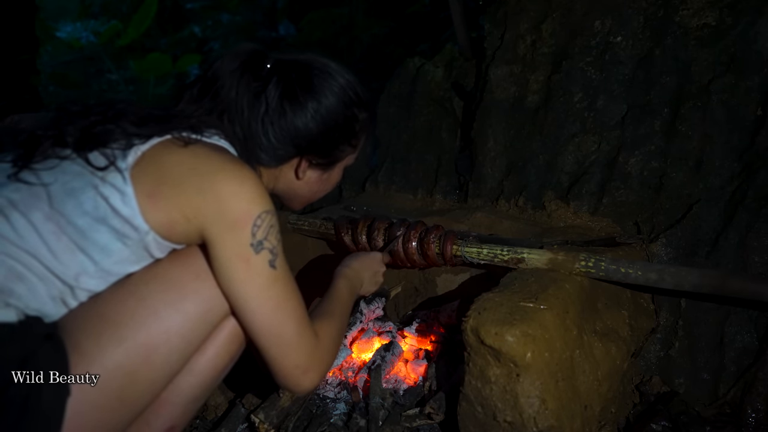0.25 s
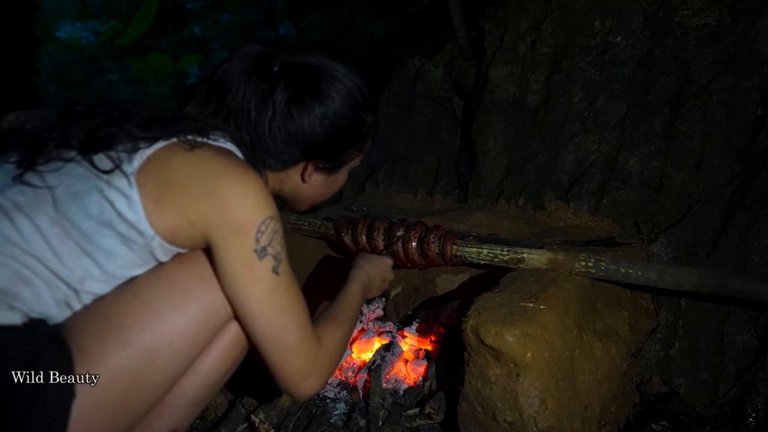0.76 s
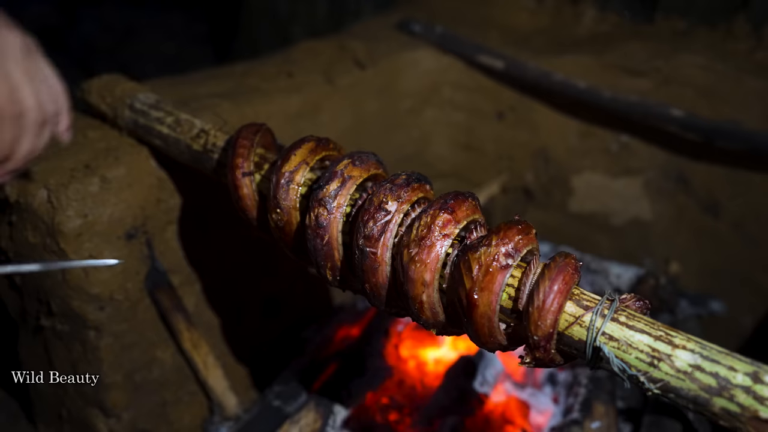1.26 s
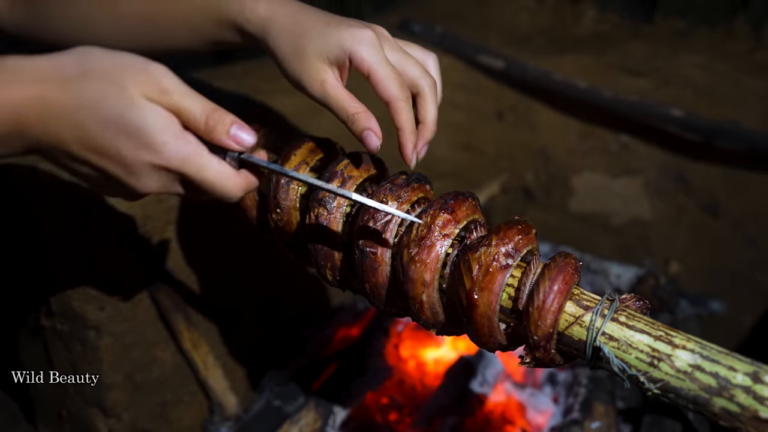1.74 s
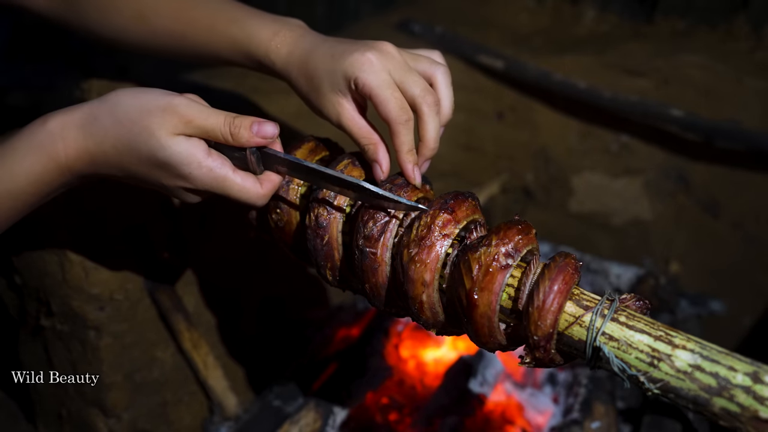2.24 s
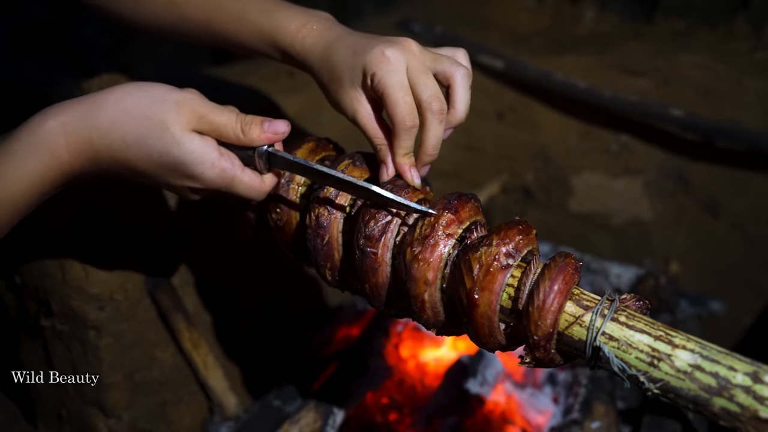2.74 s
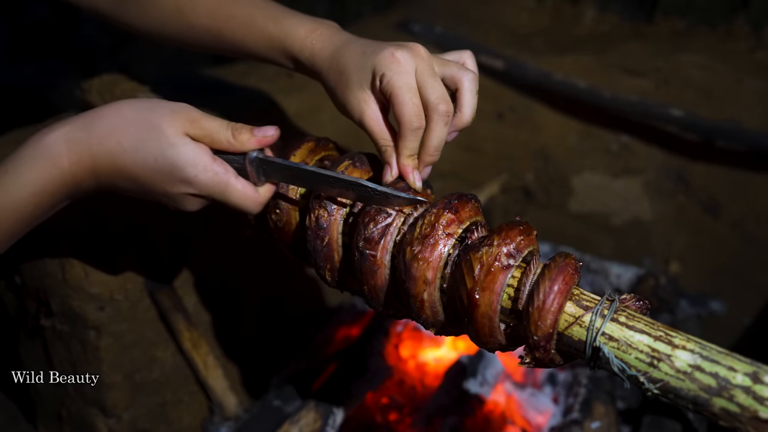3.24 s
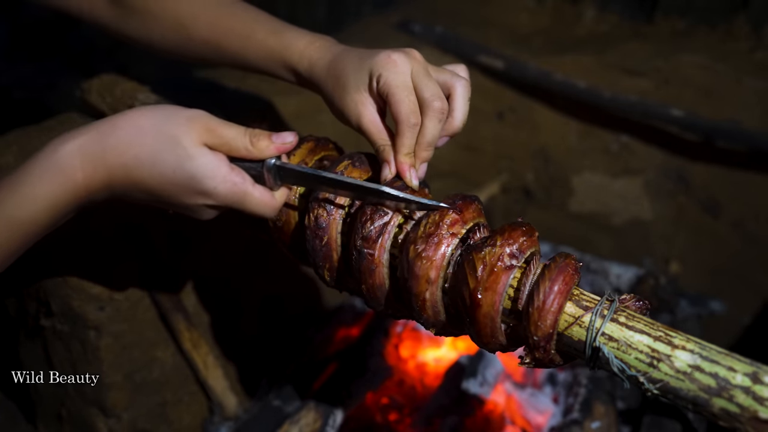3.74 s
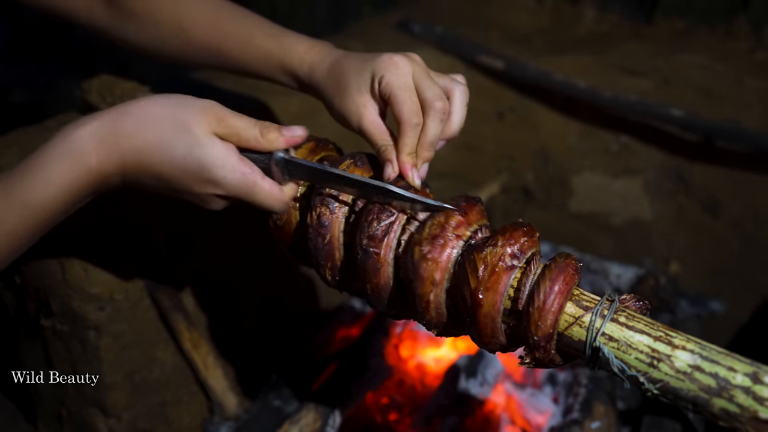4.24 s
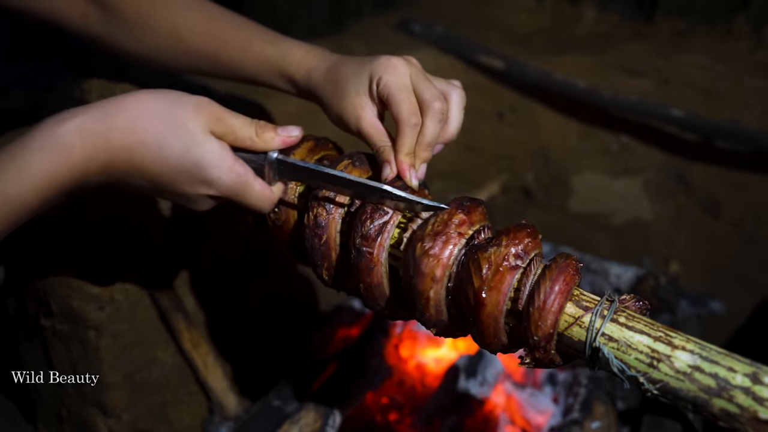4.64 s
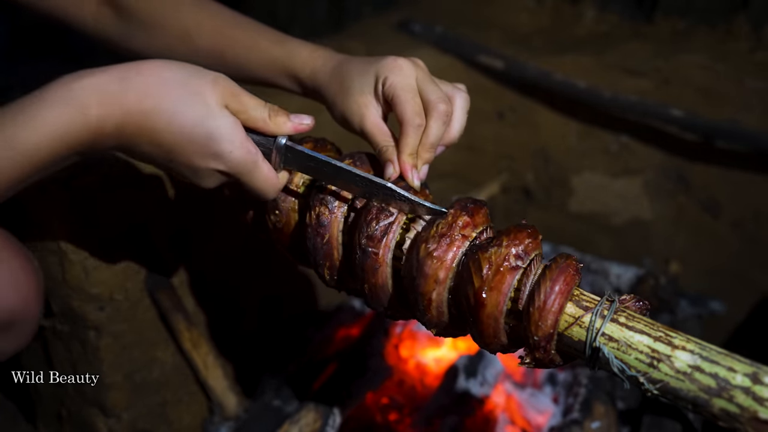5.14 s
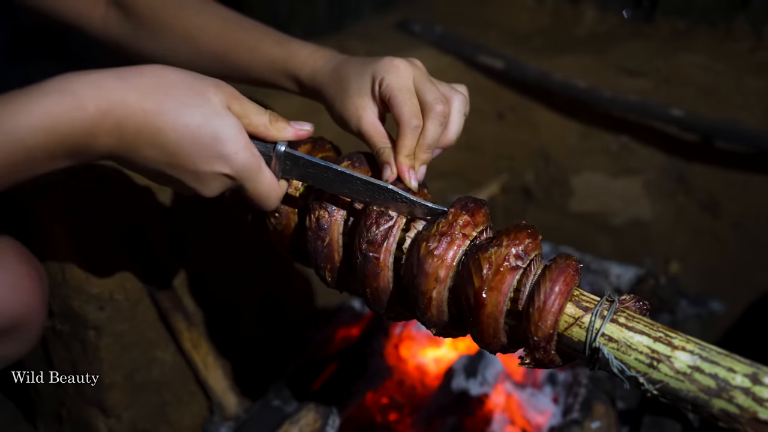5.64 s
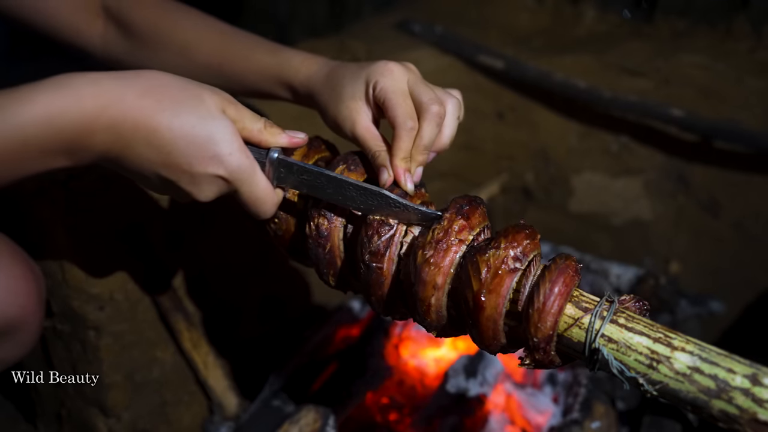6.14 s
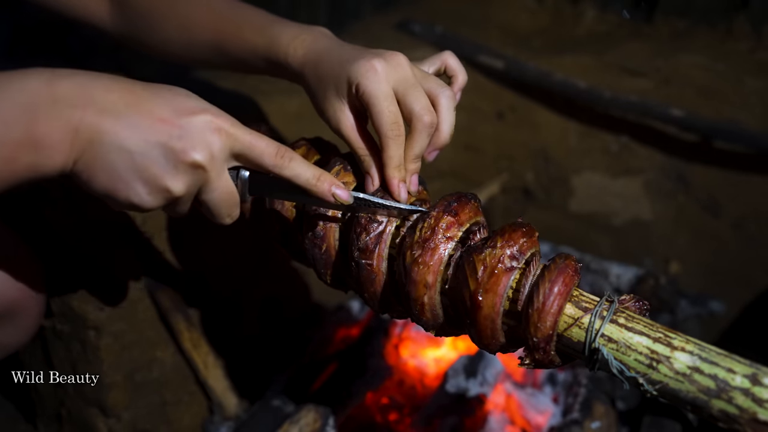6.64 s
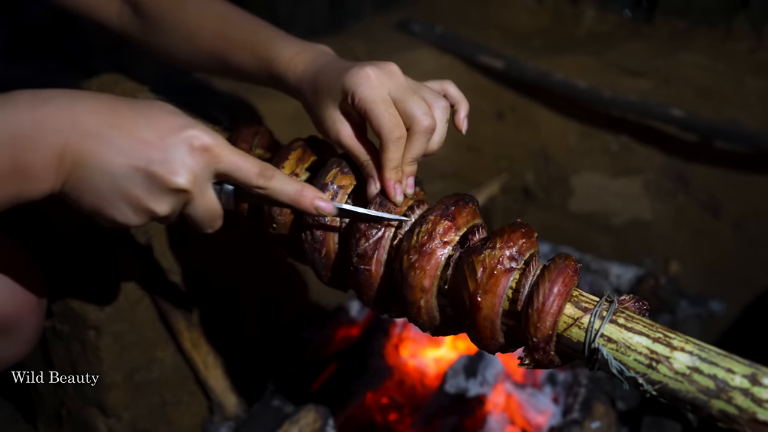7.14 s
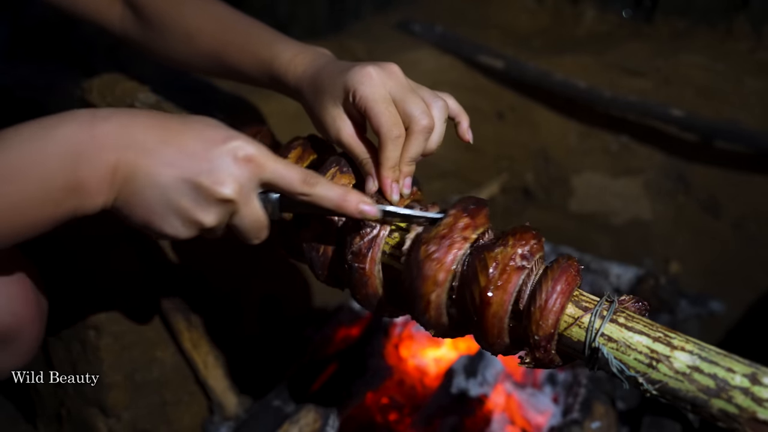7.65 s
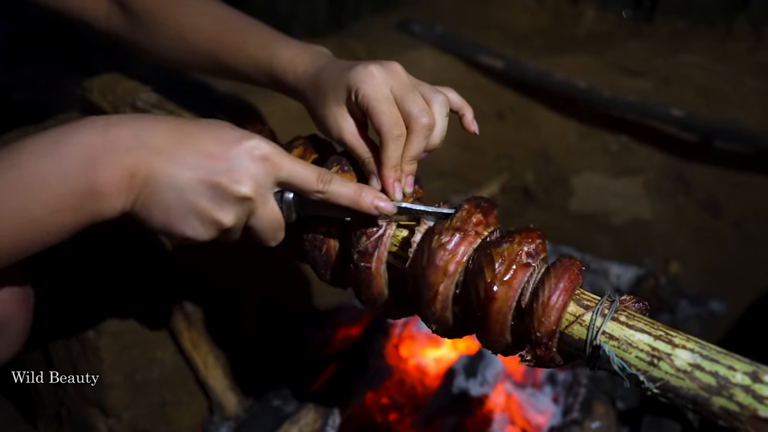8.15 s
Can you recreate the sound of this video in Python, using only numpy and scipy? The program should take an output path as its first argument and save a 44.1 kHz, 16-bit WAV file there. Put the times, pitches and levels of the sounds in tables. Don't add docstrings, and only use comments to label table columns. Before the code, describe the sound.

From 0 to 1.2 s a night forest is quiet: steady high crickets, a thin insect whine, fast bright katydid chirps about every 0.08 s, soft air and tiny fire pops. At 1.25 s the sound moves close to the embers, with slightly more sizzle; the katydid stops. From 1.9 to 3 s faint, uneven knife scratches and small crackles test the crust, with barely audible steam whistles. From 3.1 to 6.1 s the knife saws steadily, about seven short gritty rasps per second, with snapping fibres and bright fat ticks. The loudest crack strikes at 4.93 s, another cluster at 5.15-5.5 s, with brief blade ring and low spit shudder. After a lull around 6.3-6.7 s with soft knocks and ticks, sawing resumes until 8.4 s, denser, with loud tears near 7.3, 7.6, 7.85 and 8.1 s and increasingly hollow bamboo thuds. Close, dry, slight earth-bank scatter.

```python
import sys
import numpy as np
from scipy import signal
from scipy.fft import rfft, irfft, next_fast_len
from scipy.io import wavfile
from scipy.ndimage import uniform_filter1d

SR = 44100
rng = np.random.default_rng(int(sys.argv[2]) if len(sys.argv) > 2 else 0)


def dump(signal):
    limited = np.clip(np.atleast_2d(signal).T, -1, 1)
    pcm = np.round(limited * 32767).astype(np.int16)
    wavfile.write(sys.argv[1], SR, pcm)


def ratio_of_db(decibels):
    return 10 ** (np.asarray(decibels, float) / 20)


N = 369999

# start in seconds, length in seconds, rasp level in dB,
# place of hardest pressure from 0 to 1.
SCORING_STROKES = [
    (1.86, 0.071, -53, 0.44),
    (2.285, 0.053, -58, 0.1),
    (2.529, 0.051, -46, 0.22),
    (2.569, 0.077, -39, 0.3),
    (2.656, 0.054, -50, 0.1),
    (2.812, 0.11, -50, 0.4),
    (2.916, 0.056, -45, 0.43),
    (2.967, 0.091, -41, 0.24),
]
# start in seconds, length in seconds, rasp level in dB, place of hardest pressure 0-1.
FIRST_CUT_STROKES = [(3.105, 0.11, -38, 0.56), (3.246, 0.098, -39, 0.61), (3.394, 0.087, -36.5, 0.64),
                     (3.534, 0.081, -32.5, 0.62), (3.664, 0.086, -37, 0.59), (3.811, 0.087, -31.5, 0.33),
                     (3.965, 0.086, -34, 0.27), (4.089, 0.11, -34, 0.68), (4.274, 0.091, -35.5, 0.23),
                     (4.393, 0.11, -32.5, 0.87), (4.572, 0.09, -35, 0.65), (4.708, 0.1, -33.5, 0.71),
                     (4.861, 0.071, -30.5, 0.73), (5.005, 0.084, -36.5, 0.68), (5.135, 0.061, -24, 0.28),
                     (5.274, 0.093, -34.5, 0.65), (5.405, 0.041, -42, 0.54), (5.481, 0.011, -30.5, 0.15),
                     (5.627, 0.025, -21.5, 0), (5.638, 0.067, -41.5, 0), (5.76, 0.078, -34, 0.4),
                     (5.873, 0.06, -38, 0.45), (5.908, 0.077, -33.5, 0.46), (6.044, 0.057, -39.5, 0.6),
                     (6.304, .051, -50.5, 0.27)]
# start in seconds, length in seconds, rasp level in dB,
# place of hardest pressure 0-1.
SECOND_CUT_STROKES = [(6.776, 0.06, -45.5, 0.64), (6.888, 0.083, -42, 0.8), (7.025, 0.071, -37.5, 0.56),
                      (7.164, 0.089, -35.5, 0.47), (7.319, 0.066, -36, 0.34), (7.44, 0.08, -32, 0.73),
                      (7.593, 0.055, -41.5, 0.53), (7.711, 0.078, -29, 0.67), (7.876, 0.065, -36.5, 0),
                      (7.974, 0.083, -32.5, 0.68), (8.133, 0.051, -38, 0.35), (8.25, 0.072, -30, 0.9)]
# start in seconds, length in seconds, rasp level in dB.
RIDGE_BITES = [
    (6.194, 0.03, -39.5),
    (7.308, 0.026, -23),
    (7.57, 0.036, -24.5),
    (7.849, 0.029, -25),
    (8.107, 0.045, -22),
]
# stroke start in seconds, lift of upper modes in dB,
# lift of grit in dB, lift of thud in dB.
EDGE_CONTACT = [(1.863, 1, 5, -8), (2.283, 8, 8, -12), (2.531, 7.5, 5, 0), (2.569, 2.5, -1, -3.5),
                (2.655, -4, -2, 3), (2.817, 3, 9, 3), (2.916, 0, 4.5, 1), (2.966, 4.5, -9, 1.5),
                (3.105, 2.5, 3, 3), (3.244, 6, -12, 2.5), (3.394, 2, -4.5, 1), (3.537, 2.5, 1, -0.5),
                (3.663, 1.5, 0, 0.5), (3.813, -1, -6, -2), (3.968, -0.5, 4, -1.5), (4.087, 1, 2, 0.5),
                (4.275, 2, 8, 2.5), (4.397, 0.0, -3, 0.5), (4.568, 0, -0.5, 1.5), (4.711, 0.5, -0.5, 4.5),
                (4.857, 1.5, 1, 0), (5.008, 0.5, -3, 1.5), (5.134, -5, 7.5, -2), (5.277, 0.5, 0, 2.5),
                (5.401, -1, -3, -2), (5.481, 6, 7, -1), (5.626, -1.5, 3, -7.5), (5.64, 1, 4, 3),
                (5.76, 3, 1, 0.5), (5.876, 0, -13, -3.5), (5.909, -1, 3.5, -1.5), (6.045, -1.5, 1, 1.0),
                (6.196, 3, -4, 2), (6.303, 1.5, -3, -4), (6.776, 3, 1.5, 3), (6.891, 3, 0, -1.5),
                (7.027, 4, -2.5, 1), (7.166, 0.5, -3, -3.5), (7.309, 3.5, -8, 0), (7.32, 3.5, 0.5, -2.5),
                (7.443, -2, 0, -3), (7.571, -2, -2, -2.5), (7.591, 6.5, 4, -3), (7.713, -1.5, 0, -2),
                (7.848, 4, 7, 2.5), (7.874, 0.5, 8, -3), (7.974, -2.5, 6.5, 0), (8.104, 1, -5, -3),
                (8.135, 2, 4, -5.5), (8.249, 0.5, 2, -1.0)]
# frequency in Hz, width in Hz, level in dB.
BODY_MODES = [(920, 460, -4), (1238, 238, 1.5), (1700, 238, 5.5), (2290, 520, 1.5), (2690, 380, 3.5),
              (3096, 390, 0), (4080, 960, -6.5), (620, 890, -7.5)]
# frequency in Hz, width in Hz.
BLADE_RING = (6100, 135)
# time in seconds, level in dB against the grit.
GRIP_CURVE = [(2.6, -5), (2.9, -22), (3.15, -2), (3.5, -2), (3.8, -30), (4.6, -19), (4.77, -1), (4.9, -12),
              (5.2, -6), (5.6, -13), (8.39, -27)]
# time in seconds, share of the hollow thud from 0 to 1,
# thud in dB against the rasp, grit gain in dB.
HOLLOW_CURVE = [(2.5, 0.24, -11.5, -4.5), (3.5, 0.36, -12, -1), (5.3, 0.53, -13.5, 2.5),
                (6.1, 0.36, -10, -2), (6.8, 0.46, -8, 2), (7.2, 0.54, -4.5, 2), (7.8, 0.67, -8, -2),
                (8.3, 0.76, -5, -2.5)]
# time in
# seconds, peak in dB, centre in Hz.
CRUST_BREAKS = [(0.0226, -37, 2500), (0.2134, -31, 3950), (1.4494, -27, 4300), (1.6318, -33, 4500),
                (1.922, -27.5, 4000), (2.326, -28, 2600), (2.5285, -29.5, 2590), (2.5847, -22.5, 2880),
                (2.6624, -23, 2530), (2.6919, -24.5, 3130), (2.8392, -25.5, 2500), (3.153, -21.5, 3900),
                (3.267, -22, 2860), (3.404, -31, 3100), (3.4338, -28, 1090), (3.5253, -17, 4400),
                (3.5255, -20, 2100), (3.5473, -20, 2430), (3.5812, -20, 1650), (3.8282, -18, 2020),
                (3.9741, -20, 1710),
                (4.184, -22, 1820), (4.2815, -23, 1230), (4.3068, -21.5, 1550), (4.584, -33, 1640),
                    (4.6134, -24, 3920), (4.741, -28, 1100), (4.768, -14.5, 5800), (4.869, -36, 1560),
                    (4.8825, -28, 1230), (4.9314, -2, 4400), (5.139, -13, 4200), (5.1477, -9, 2940),
                    (5.1738, -7.5, 1900), (5.2821, -30.5, 2480), (5.3897, -33, 2210), (5.4824, -16.5, 1620),
                    (5.4825, -9, 7350), (5.5766, -30, 4830), (5.6268, -16, 5970), (5.776, -25, 2410),
                    (5.888, -24, 1730), (5.9266, -24, 1230), (6.0503, -29, 2640), (6.109, -32.5, 4130),
                    (6.2014, -20, 2300),
                (6.758, -27, 1570), (6.786, -25, 3040), (6.7976, -21.5, 3400), (7.0076, -30, 3860),
                     (7.038, -25, 3790), (7.0763, -22.5, 1880), (7.1528, -28, 4400), (7.219, -16.5, 2500),
                     (7.2857, -20, 4350), (7.3104, -11, 1720), (7.3145, -23, 2300), (7.422, -28, 8360),
                     (7.437, -28, 2640), (7.65, -26.5, 4840), (7.848, -14, 1490), (7.8843, -11, 1700),
                     (7.991, -28.5, 1200), (8.019, -17.5, 1720), (8.126, -11, 1700)]
# time in seconds, # peak in dB, centre in Hz.
FURTHER_BREAKS = [(0.67, -38, 1900), (1.373, -35, 4990), (1.8908, -29, 4330), (1.91, -31, 4230),
                  (2.291, -33, 2270), (2.335, -28, 5030), (3.1707, -22, 1980), (3.286, -21, 2450),
                  (3.453, -23, 6040), (3.597, -25, 2190), (3.6855, -26, 2850), (3.7117, -23, 1660),
                  (3.8491, -17, 2200), (3.843, -15.5, 2600), (3.9802, -19, 2290), (4.2335, -34.5, 1730),
                  (4.476, -13.5, 1330), (4.5638, -23.5, 1120), (4.6902, -37, 1080), (4.9754, -32, 1380),
                  (5.1647, -7.5, 1700), (5.255, -30, 3500), (5.9554, -19.5, 1900), (6.0623, -22, 2620),
                  (6.1704, -25, 4870), (6.1852, -26, 3500), (6.337, -28, 4700), (6.575, -29, 4520),
                  (6.66, -28, 4340), (6.7094, -30, 3920), (6.793, -17, 3380), (6.8134, -25, 3330),
                  (6.876, -25, 4590), (6.9598, -24, 2600), (7.086, -18, 1440), (7.133, -31, 5080),
                  (7.2606, -34, 4670), (7.312, -7, 1660), (7.317, -17, 2660), (7.3534, -31, 2670),
                  (7.4796, -23, 1590), (7.5766, -15, 1910), (7.72, -26, 2610), (7.855, -13, 3070),
                  (8.1085, -9, 1800), (8.112, -14, 1690), (8.302, -16.5, 1500), (7.5895, -8.5, 1890),
                  (7.768, -14, 2000), (7.88, -21, 1700), (4.794, -23, 3500), (5.076, -18, 3500)]
# time in seconds, peak in dB.
BLADE_JOLTS = [
    (2.19, -45),
    (2.253, -48),
    (3.526, -25),
    (5.15, -17),
    (5.482, -21.5),
    (5.628, -23),
    (6.801, -29),
]
# time in seconds, peak in dB, centre in Hz.
HAND_KNOCKS = [(0.666, -55, 215), (0.973, -42.5, 1270), (1.39, -42.5, 1070), (1.778, -40, 1700),
               (1.872, -45, 1100), (1.924, -41, 198), (2.625, -35, 525), (2.986, -42, 2840),
               (3.431, -27.5, 473), (3.436, -35, 174), (3.777, -35, 2340), (6.541, -40.5, 520),
               (6.567, -37, 2200), (6.637, -39.5, 182), (5.31, -33.5, 350), (7.848, -22, 430),
               (7.886, -29, 326), (8.108, -24.5, 403)]
# time in
# seconds, # peak in dB.
BRIGHT_TICKS = [(0.7118, -41), (1.6307, -30), (2.5365, -26), (3.5803, -19), (3.671, -25), (3.685, -22),
                          (3.901, -28), (3.9799, -22), (4.187, -15), (4.347, -23), (4.5863, -22), (4.6139, -21),
                          (4.6488, -23), (5.076, -29), (5.148, -10), (5.4246, -25), (5.4817, -8.5), (5.9549, -30),
                          (6.1094, -23.5), (6.1735, -29), (6.576, -28), (6.799, -18), (7.1693, -21), (7.218, -12),
                          (7.2848, -22), (7.3543, -23), (7.419, -19.5), (7.4357, -15), (7.508, -15.5), (7.6503, -15),
                          (1.8606, -32), (1.8894, -35), (1.475, -42), (2.11, -42), (2.312, -34), (4.195, -25),
                (5.197, -32), (6.42, -35), (6.68, -38), (7.992, -27), (2.0775, -34), (3.747, -27),
                (4.2323, -33), (4.2572, -29), (4.2757, -33), (4.8815, -28), (4.9921, -29), (5.254, -30),
                (5.3358, -31), (5.457, -29), (6.0028, -39), (6.155, -27), (6.7527, -29), (6.8134, -31),
                (6.8568, -31), (6.9047, -29), (7.0055, -32), (7.021, -26), (7.0614, -28), (7.1327, -31),
                (7.1506, -30), (7.6685, -24), (8.266, -23.5),
                          (1.9251, -29), (2.3215, -32), (2.4315, -42), (2.5931, -36), (2.6682, -30), (2.6829, -32),
                    (2.839, -27), (3.2122, -41), (3.5988, -23), (3.6033, -30), (3.6375, -38), (3.6667, -36),
                    (3.6941, -34), (3.8113, -31), (3.9842, -23), (4.0041, -30), (4.1418, -32), (4.6277, -28),
                    (4.6651, -39), (4.6908, -39), (4.7402, -27), (4.7939, -34), (4.9054, -23), (4.9754, -33),
                    (5.3119, -33), (5.577, -31), (5.6629, -31), (5.7661, -38), (5.9041, -41), (6.0787, -32),
                    (6.1231, -36), (6.166, -27), (6.3276, -29), (6.3441, -33), (6.8968, -38), (7.1597, -29),
                    (7.1864, -27.5), (7.191, -25), (7.2732, -32), (7.2914, -31), (7.3049, -26), (7.4975, -31),
                    (7.5217, -35), (7.6209, -33), (7.693, -35), (7.7065, -40), (7.7307, -26), (7.8083, -34),
                    (8.0799, -34), (8.2502, -33), (8.3261, -36)]
# low edge in Hz, high edge in Hz.
TICK_EDGES_HZ = [5000., 14500.]
# time in seconds, shaking in dB, second mode in dB against the first.
SHUDDER_CURVE = [(0.0, -83.5, 0), (1.87, -74.5, 11), (1.98, -52, -7), (2.2, -73, 3), (2.34, -58, -8),
                 (2.48, -71.5, 8), (3.29, -56.5, -0.5), (4.05, -60, 5), (4.4, -55.5, 2), (4.55, -58.5, -3),
                 (5.22, -49.5, -1), (5.42, -59, -8), (5.69, -46.5, -17), (5.9, -55.5, -2), (6.1, -44, -12),
                 (6.5, -72.5, 7), (7.05, -50, -6), (8.39, -50.5, -7)]
# frequency in Hz, width in Hz.
SPIT_MODES = [(51, 16), (98, 24.6)]
# time in
# seconds, frequency in Hz, level in dB.
FAINT_TONES = [
    [(1.26, 15050, -70), (1.4, 15600, -71), (1.5, 15100, -72), (1.6, 15400, -77), (1.8, 15650, -74)],
    [(1.95, 15450, -72), (2.06, 15700, -72)],
    [(2.17, 15200, -72), (2.26, 15500, -72)],
    [(2.38, 15100, -72), (2.5, 15650, -72), (2.8, 15400, -73), (3.0, 15700, -72), (3.4, 15600, -72),
     (4.5, 15600, -74)],
    [(2.74, 536, -60), (3.0, 538, -61), (3.2, 580, -61), (3.4, 620, -68)],
    [(2.8, 1640, -66), (3.1, 1623, -63), (3.45, 1650, -67)],
    [(0.64, 211, -67), (0.8, 220, -64)],
]
KATYDID_CHIRPS_S = [0.0, .0644, .1344, .2124, .2932, .3721, .4644, .5744, .6489, .7144, .8006, .8709, .9344,
                    1.0365, 1.1248, 1.1844]
# frequency in Hz, width in Hz, level in dB.
WING_MODES = [(8700, 650, 15), (11400, 1400, 4), (12300, 1700, 8)]
# frequency in Hz, width in Hz, level in dB.
CRICKET_BANDS = [(4350, 170, -67.5), (4674, 260, -61), (4980, 320, -63.5), (5100, 110, -66),
                 (8780, 1200, -69.5)]
# time in seconds, level in dB.
WHINE_CURVE = [(0, -75), (1.0, -75), (1.15, -95), (8.39, -95)]
# time in seconds,
# night air in dB, ember sizzle in dB.
AIR_CURVE = [(0, -58.5, -74), (1.24, -57, -71), (1.27, -56, -66), (3.0, -54, -61.5), (5.0, -52, -63),
             (6.5, -56, -63), (8.39, -49.5, -57.5)]
# frequency in Hz, density in dB per Hz.
NIGHT_COLOUR = [(12, -47), (20, -15), (70, -9), (193, 1.5), (367, -3.5), (434, -4), (1120, -3.5),
                (3740, -7.5), (4810, -3), (5850, -13.5), (8890, -15.5), (12400, -23.5), (16000, -32)]


def rms_one(x):
    return x / np.sqrt(np.mean(x ** 2) + 1e-20)


def in_time(rows):
    time_s, *columns = np.transpose(rows)
    return [np.interp(np.arange(N) / SR, time_s, column) for column in columns]


def drift(rate_hz):
    r = np.exp(-80 * np.pi * rate_hz / SR)
    noise = rng.standard_normal(N // 40 + 2002)
    slow = signal.lfilter([1], [1, -2 * r, r * r], noise)[2000:]
    return np.interp(np.arange(N) / 40, np.arange(len(slow)), rms_one(slow))


def resonance(x, hz, width_hz):
    r = np.exp(-np.pi * width_hz / SR)
    feedback = [1, -2 * r * np.cos(2 * np.pi * hz / SR), r * r]
    return signal.lfilter(np.array([1, 0, -1]) * (1 - r * r) / 2, feedback, x)


def passed(x, hz, kind):
    return signal.sosfilt(signal.butter(2, hz, kind, fs=SR, output="sos"), x)


def grains(per_s, spread_db):
    size = ratio_of_db(spread_db * np.minimum(rng.exponential(1, N), 4))
    signed = size * rng.choice([-1, 1], N)
    return signed * (rng.random(N) < per_s / SR) + 1e-18


def stroke_rows():
    strokes = SCORING_STROKES + FIRST_CUT_STROKES + SECOND_CUT_STROKES
    return [(*row, 0) for row in strokes] + [(*row, 0.3, -18) for row in RIDGE_BITES]


def edge_pressure():
    rise_db, fall_db = 15.5, 19
    grit_base_db, grit_per_db = -8.5, -0.3236
    sheen_base_db, sheen_even = -15, 0.3
    rasp, upper, deep, bright, sheen = np.zeros((5, N))
    for start, length, peak_db, place, dull_db in stroke_rows():
        _, upper_db, grit_db, thud_db = min(EDGE_CONTACT, key=lambda row: abs(row[0] - start))
        at = np.arange(round(start * SR), min(round((start + length) * SR), N))
        along = (at / SR - start) / length
        before_db = rise_db * (1 - along / place) ** 2
        after_db = fall_db * ((along - place) / (1 - place)) ** 2
        loss_db = np.where(along < place, before_db, after_db)
        grip = np.clip(np.minimum(along / 0.032, (1 - along) / 0.15), 0, 1)
        press = grip * ratio_of_db(peak_db - 2.5 - loss_db)
        edge_db = grit_base_db + grit_db + dull_db
        rasp[at] += press
        upper[at] += press * ratio_of_db(upper_db)
        deep[at] += press * ratio_of_db(thud_db)
        bright[at] += press * ratio_of_db(edge_db + grit_per_db * (peak_db + 36.5) - 0.26 * loss_db)
        sheen[at] += press * ratio_of_db(edge_db + sheen_base_db + grit_per_db * (peak_db + 37) + sheen_even * loss_db)
    return rasp, upper, deep, bright, sheen


def knife():
    rasp, upper, deep, bright, sheen = edge_pressure()
    snaps = grains(4200, spread_db=3.5) * ratio_of_db(2.67 * drift(106))
    body, all_modes = 0, 0
    for k, (hz, width_hz, db) in enumerate(BODY_MODES):
        mode = (-1) ** k * ratio_of_db(db + 2.35 * drift(21.6)) * resonance(snaps, hz, width_hz)
        body = body + (upper if hz > 2000 else rasp) * mode
        all_modes = all_modes + mode
    body = body / np.std(all_modes)
    grit = rms_one(passed(passed(snaps, 3240, "high"), 7650, "low"))
    hiss = sheen * rms_one(passed(snaps + 1.5 * rng.standard_normal(N), 10500, "high"))
    ring = ratio_of_db(in_time(GRIP_CURVE)[0]) * rms_one(resonance(snaps, *BLADE_RING))
    hollow, thud_db, grit_db = in_time(HOLLOW_CURVE)
    meat_thud = rms_one(passed(snaps, [190, 600], "band"))
    bamboo_thud = rms_one(passed(snaps, [430, 1050], "band"))
    thud = (1 - hollow) * meat_thud + hollow * bamboo_thud
    low = passed(body + deep * ratio_of_db(thud_db + 8) * thud, 125, "high")
    return low + ratio_of_db(grit_db) * (bright * (grit + ring) + hiss)


def cracks():
    out, t = np.zeros(N + 4000), np.arange(4000) / SR
    rows = CRUST_BREAKS
    rows = rows + [(s, db - 6, hz) for s, db, hz in FURTHER_BREAKS]
    for (s, peak_db, hz), noise in zip(rows, rng.standard_normal((len(rows), 4000))):
        t60_s = max(0.037 - 0.0007 * (peak_db + 28), 0.005)
        top_db = -25.5 + 7 * np.log2(hz / 2500)
        burst = noise * (ratio_of_db(-60 * t / 0.0019) + 0.37 * ratio_of_db(-60 * t / t60_s))
        burst[0] = 2.7
        own = resonance(burst, hz, 0.4 * hz)
        body = sum((-1) ** k * ratio_of_db(db) * resonance(burst, f, w) for k, (f, w, db) in enumerate(BODY_MODES))
        top = passed(burst * ratio_of_db(-60 * t / 0.029), 10600, "high")
        hit = own / np.abs(own).max() + 0.17 * body / np.abs(body).max()
        hit = passed(hit, min(2.47 * hz, 0.45 * SR), "low")
        hit = hit / np.abs(hit).max() + ratio_of_db(top_db) * top / np.abs(top).max()
        out[round(s * SR):][:4000] += ratio_of_db(peak_db) * hit / np.abs(hit).max()
    return out[:N]


def blade_ticks():
    flicks, width_hz = np.full(N, 1e-18), BLADE_RING[1]
    for s, peak_db in BLADE_JOLTS:
        flicks[round(s * SR)] = ratio_of_db(peak_db) * SR / (2 * np.pi * width_hz)
    return resonance(flicks, *BLADE_RING)


def knocks():
    out, t = np.zeros(N + 3000), np.arange(3000) / SR
    for (s, peak_db, hz), noise in zip(HAND_KNOCKS, rng.standard_normal((len(HAND_KNOCKS), 3000))):
        push = noise * ratio_of_db(-60 * t / 0.033)
        knock = resonance(resonance(push, hz, 0.23 * hz), hz, 1.1 * hz)
        out[round(s * SR):][:3000] += ratio_of_db(peak_db - 3) * knock / np.abs(knock).max()
    return out[:N]


def ticks():
    out, t = np.zeros(N + 600), np.arange(600) / SR
    envelope = ratio_of_db(-60 * t / 0.003) + 0.3 * ratio_of_db(-60 * t / 0.024)
    rows = BRIGHT_TICKS
    for (s, peak_db), noise in zip(rows, rng.standard_normal((len(rows), 600))):
        snap = passed(noise * envelope, TICK_EDGES_HZ, "band")
        out[round(s * SR):][:600] += ratio_of_db(peak_db - 3.5) * snap / np.abs(snap).max()
    return out[:N]


def crumbs():
    time_s = np.arange(N) / SR
    fat = passed(signal.lfilter([1], [1, 0.6], grains(11, spread_db=2)), 6000, "high")
    fat = ratio_of_db(-44) * (time_s > 1.8) * fat
    falls = grains(70, spread_db=4.5) * ratio_of_db(7.2 * drift(4.5))
    dealt = rng.integers(0, 4, N)
    rung = sum(resonance(falls * (dealt == k), hz, 0.51 * hz) for k, hz in enumerate([1540, 2500, 3860, 6630]))
    return fat + np.interp(time_s, [1.2, 3.0], ratio_of_db([-58, -43])) * rung


def spit():
    shake_db, second_db = in_time(SHUDDER_CURVE)
    out = 0
    for db, (hz, width_hz) in zip([shake_db, shake_db + second_db], SPIT_MODES):
        swing = resonance(rng.standard_normal(N), hz, width_hz)
        swing = rms_one(resonance(swing, hz, 2 * width_hz))
        evened = swing / np.sqrt(uniform_filter1d(swing ** 2, size=5000) + 2.5)
        out = out + ratio_of_db(db) * rms_one(evened)
    return out


def whistles():
    out, waver, flicker = np.zeros(N), drift(45), drift(28)
    for rows in FAINT_TONES:
        s, hz, db = np.transpose(rows)
        at = np.arange(round(s[0] * SR), round(s[-1] * SR))
        pitch_hz = np.interp(at / SR, s, hz) * (1 + 0.0044 * waver[at])
        level = ratio_of_db(np.interp(at / SR, s, db) + 4 * flicker[at])
        out[at] += level * np.sin(2 * np.pi * np.cumsum(pitch_hz) / SR)
    return out


def katydid():
    t, pulse = np.arange(2 * SR) / SR, np.zeros(N)
    for s, uneven in zip(KATYDID_CHIRPS_S, rng.standard_normal(len(KATYDID_CHIRPS_S))):
        pulse[:2 * SR] += ratio_of_db(-56.5 - 7.5 + 1.5 * uneven) * np.exp(-((t - s - 0.014) / 0.015) ** 2)
    teeth = grains(9000, spread_db=1.5)
    wing = sum(ratio_of_db(db) * resonance(resonance(teeth, hz, w), hz, w) for hz, w, db in WING_MODES)
    return pulse * rms_one(wing)


def crickets():
    out = ratio_of_db(in_time(WHINE_CURVE)[0]) * rms_one(resonance(rng.standard_normal(N), 6430, 60))
    for hz, width_hz, db in CRICKET_BANDS:
        level = ratio_of_db(db + drift(8.9))
        strikes = resonance(grains(3000, spread_db=1.5), hz, width_hz)
        out = out + level * rms_one(resonance(strikes, hz, 2 * width_hz))
    return out


def night():
    air_db, sizzle_db = in_time(AIR_CURVE)
    size = next_fast_len(N)
    hz = np.maximum(np.fft.rfftfreq(size, 1 / SR), 1)
    colour_hz, colour_db = np.transpose(NIGHT_COLOUR)
    colour = ratio_of_db(np.interp(np.log(hz), np.log(colour_hz), colour_db))
    air = irfft(rfft(rng.standard_normal(N), size) * colour, size)[:N]
    air = ratio_of_db(0.7 * drift(4)) * rms_one(air)
    sizzle = rms_one(passed(grains(4000, spread_db=3) * ratio_of_db(2.2 * drift(20)), 9000, "high"))
    sizzle = sizzle + 0.6 * resonance(sizzle, 16000, 500)
    return ratio_of_db(air_db) * air + ratio_of_db(sizzle_db) * rms_one(sizzle)


def scene():
    near = knife() + cracks() + blade_ticks() + knocks() + ticks() + crumbs()
    t = np.arange(4000) / SR
    bank = passed(rng.standard_normal(len(t)) * ratio_of_db(-60 * t / 0.028) * (t > 0.003), 2900, "low")
    scatter = signal.fftconvolve(near, bank / np.sqrt(np.sum(bank ** 2)))[:N]
    far = spit() + whistles() + katydid() + crickets() + night()
    return (near + ratio_of_db(-17.5) * scatter + far)[None]


def roll_off(x):
    return signal.sosfilt(signal.butter(12, 16990, fs=SR, output="sos"), x)


def record(dry):
    kept = signal.sosfiltfilt(signal.cheby2(14, 30, 15900, fs=SR, output="sos"), dry)
    over = signal.sosfiltfilt(signal.butter(8, 16700, fs=SR, output="sos"), dry - kept)
    loud = uniform_filter1d(np.abs(over), size=100) > ratio_of_db(-54)
    gate = uniform_filter1d(loud * 1.0, size=60)
    return roll_off(kept + 0.18 * over * gate)


dry = scene()
out = record(dry)
dump(out)
```